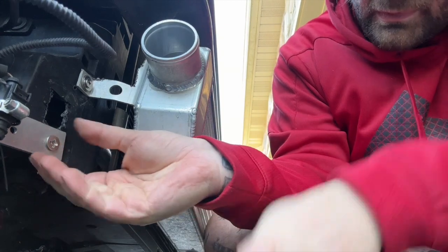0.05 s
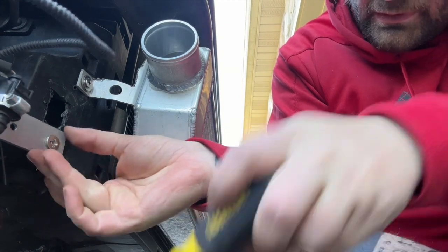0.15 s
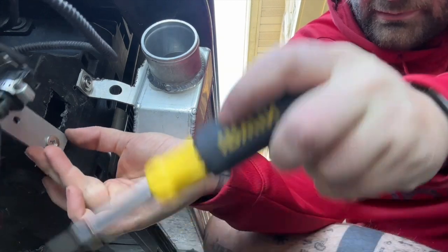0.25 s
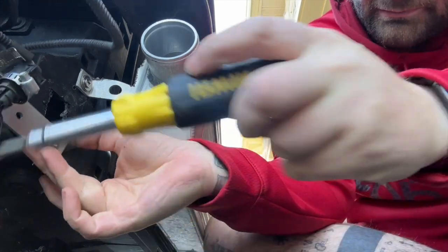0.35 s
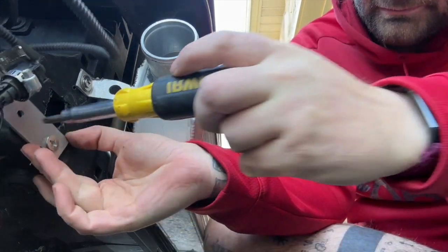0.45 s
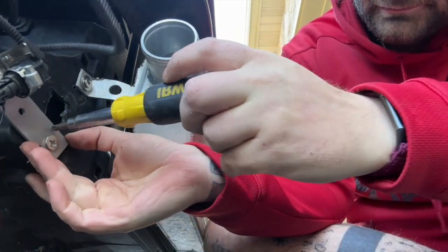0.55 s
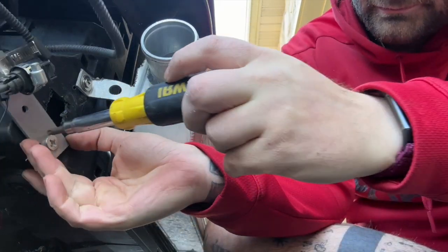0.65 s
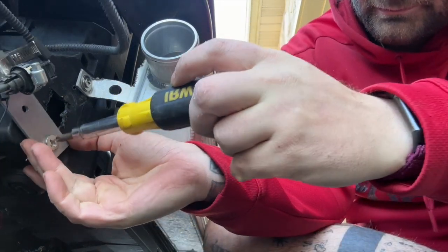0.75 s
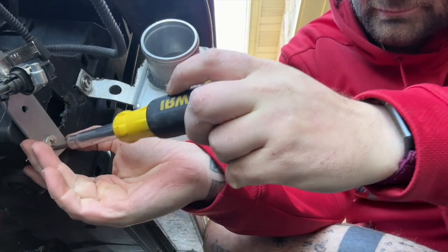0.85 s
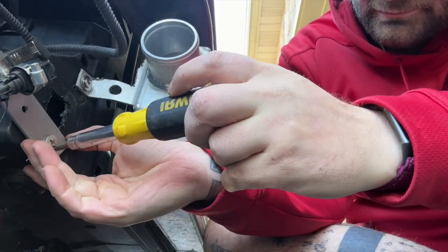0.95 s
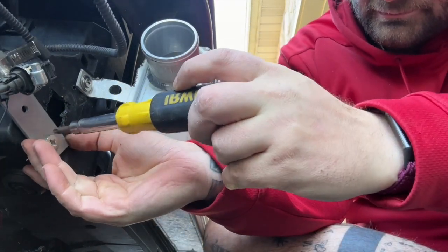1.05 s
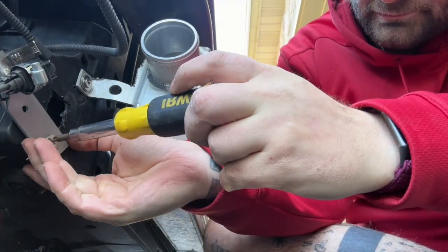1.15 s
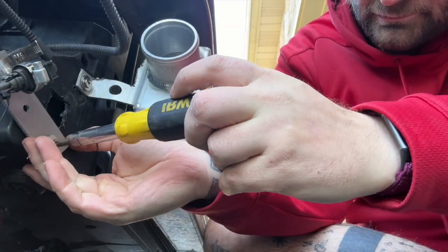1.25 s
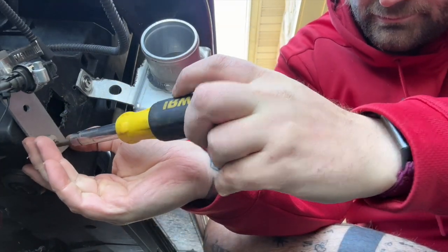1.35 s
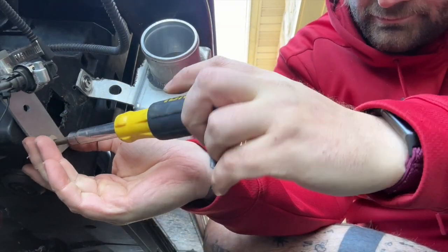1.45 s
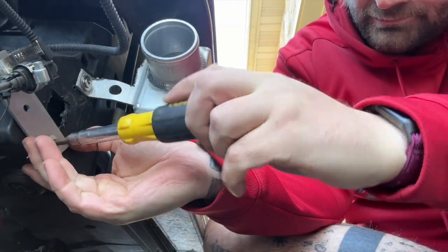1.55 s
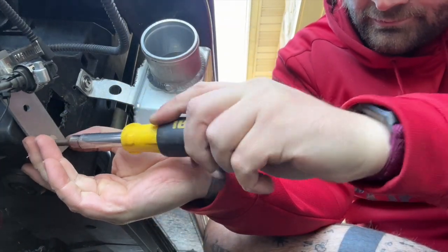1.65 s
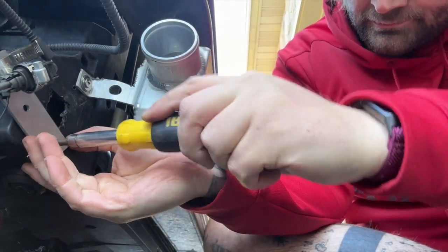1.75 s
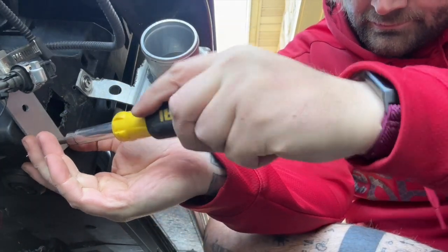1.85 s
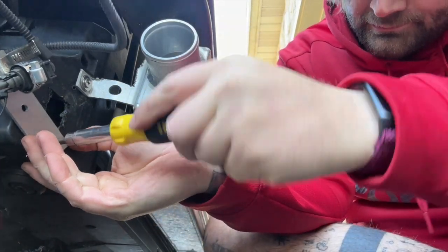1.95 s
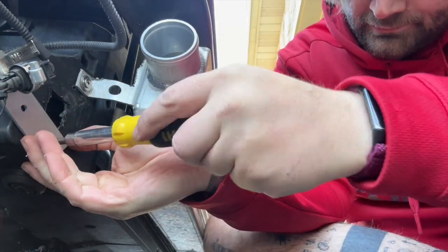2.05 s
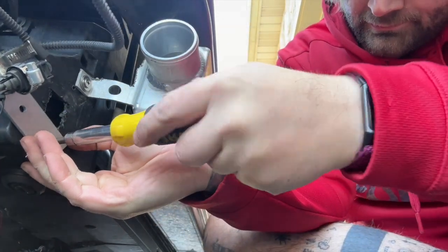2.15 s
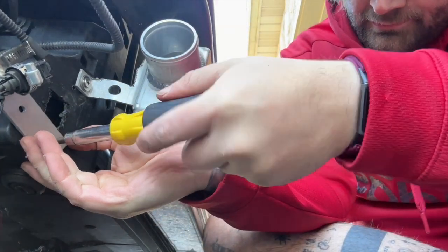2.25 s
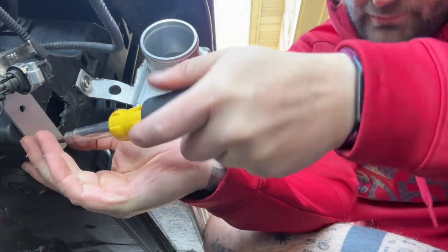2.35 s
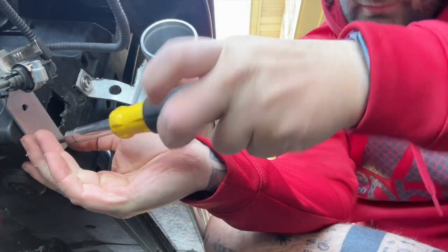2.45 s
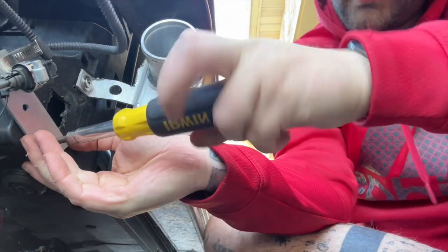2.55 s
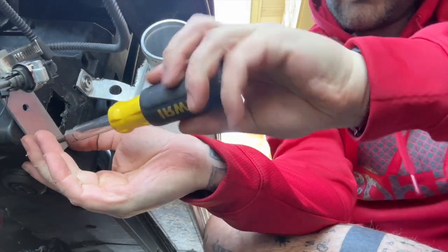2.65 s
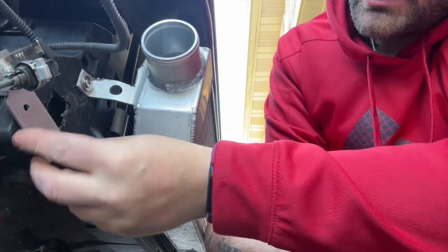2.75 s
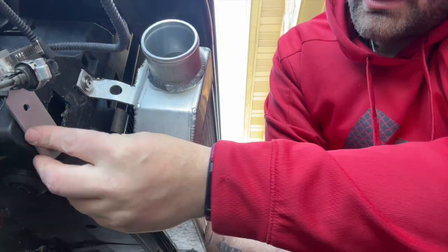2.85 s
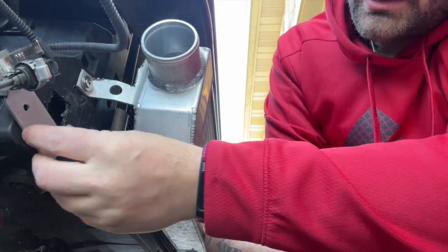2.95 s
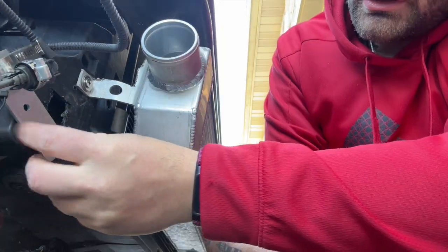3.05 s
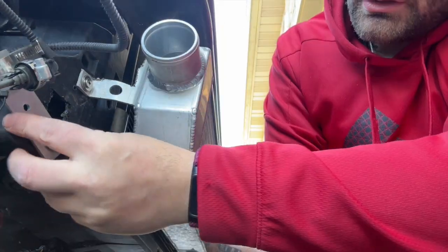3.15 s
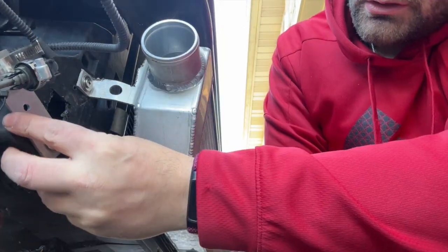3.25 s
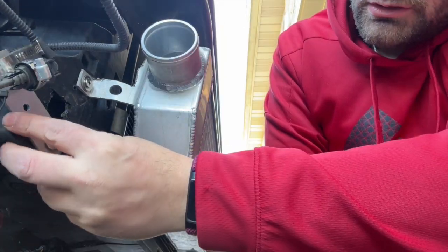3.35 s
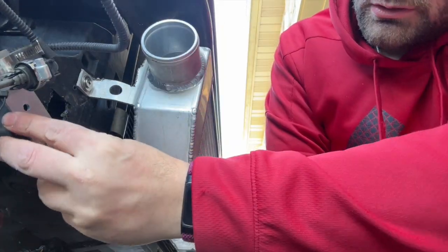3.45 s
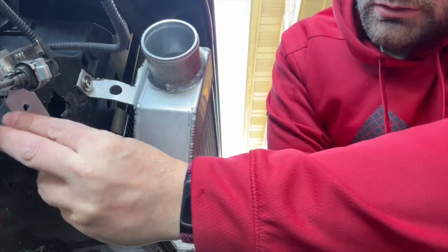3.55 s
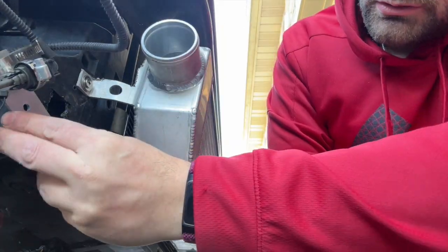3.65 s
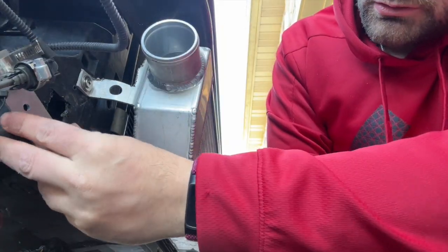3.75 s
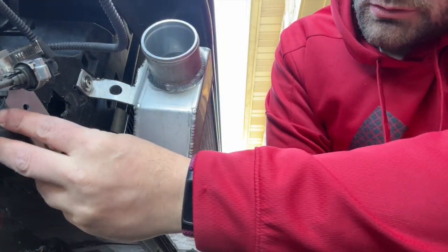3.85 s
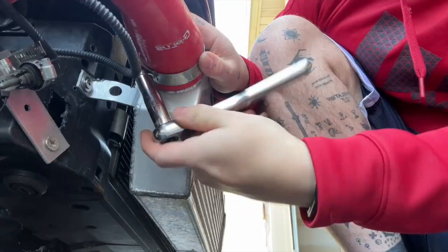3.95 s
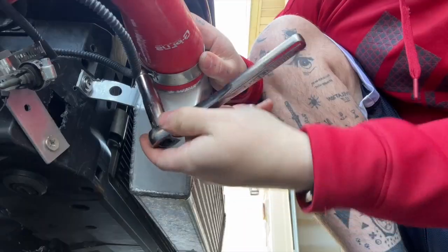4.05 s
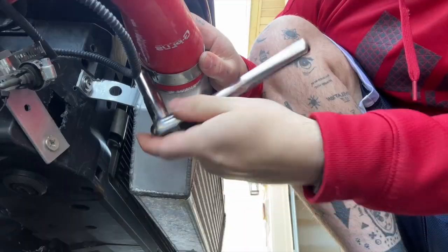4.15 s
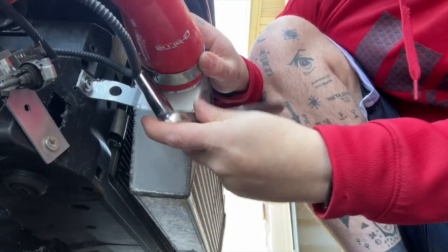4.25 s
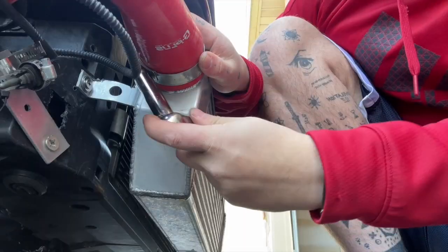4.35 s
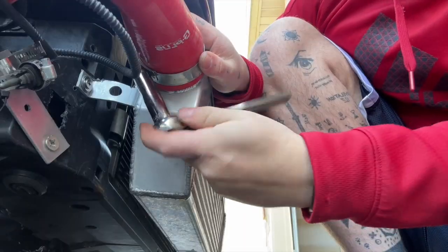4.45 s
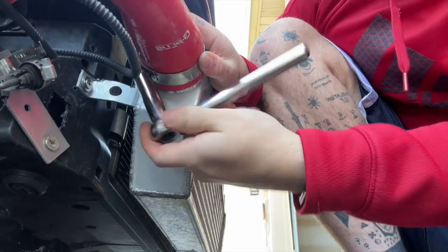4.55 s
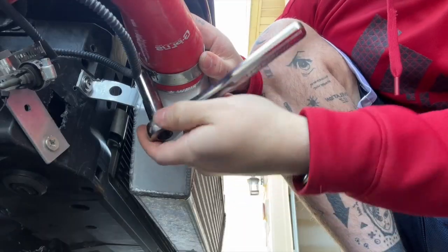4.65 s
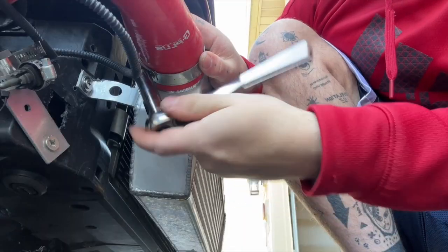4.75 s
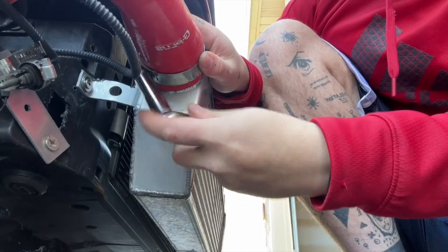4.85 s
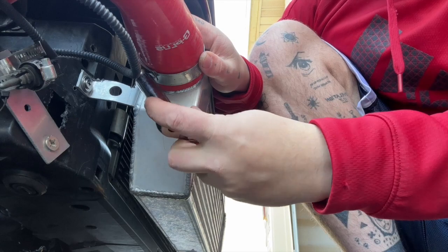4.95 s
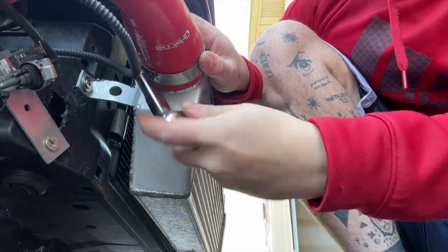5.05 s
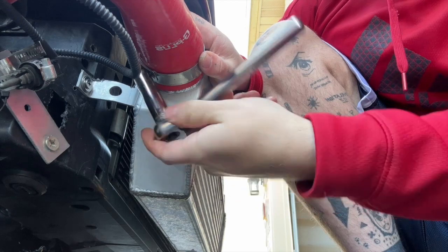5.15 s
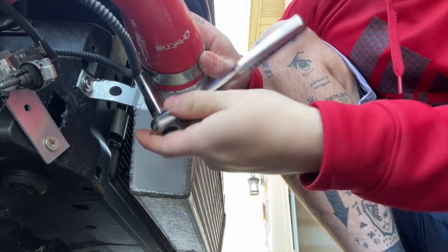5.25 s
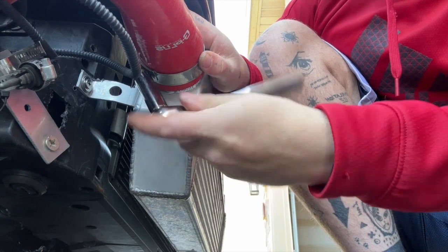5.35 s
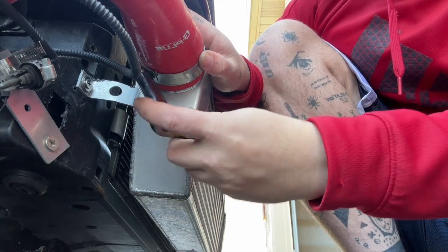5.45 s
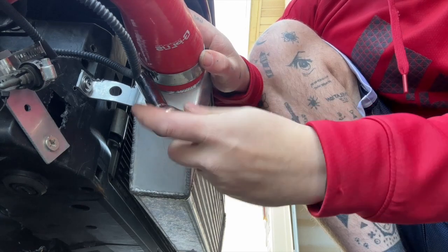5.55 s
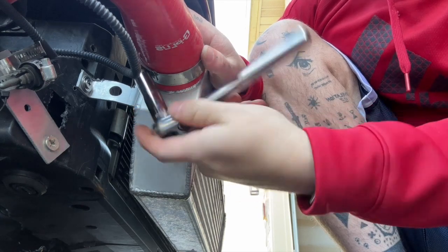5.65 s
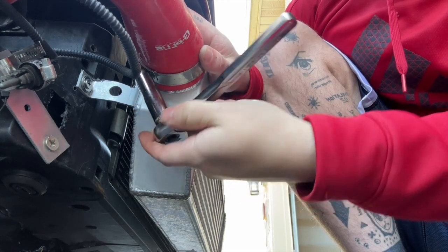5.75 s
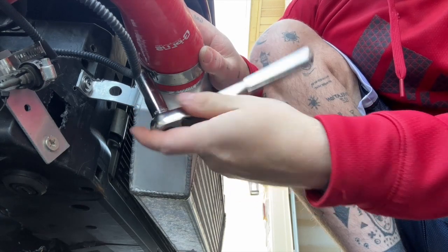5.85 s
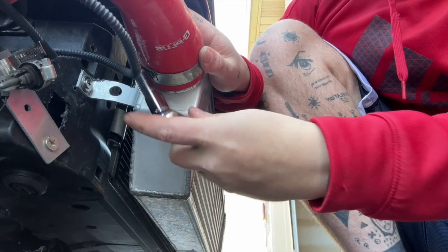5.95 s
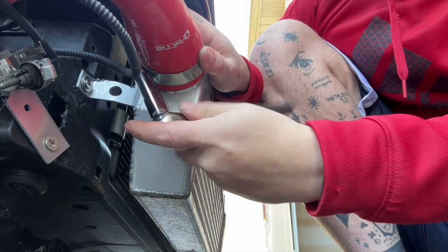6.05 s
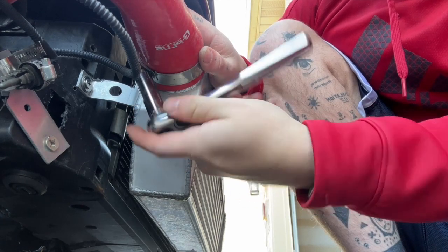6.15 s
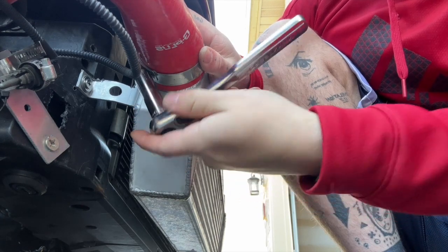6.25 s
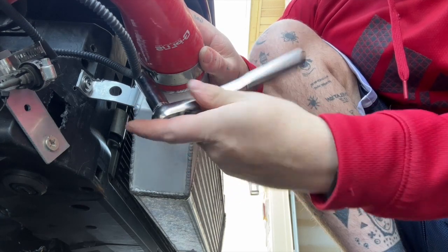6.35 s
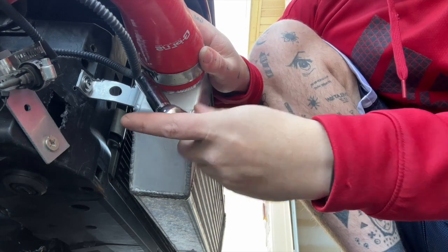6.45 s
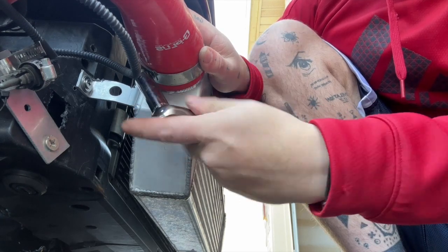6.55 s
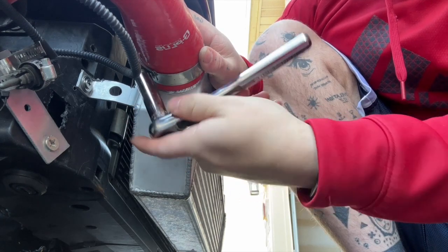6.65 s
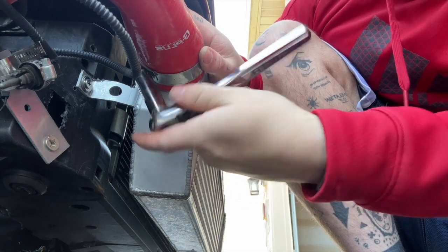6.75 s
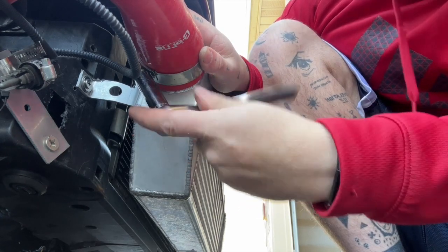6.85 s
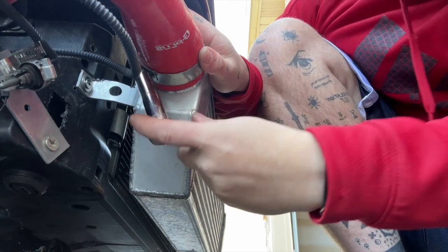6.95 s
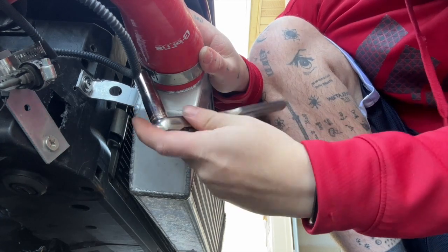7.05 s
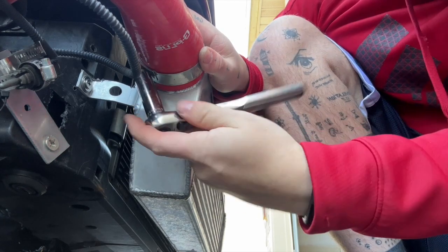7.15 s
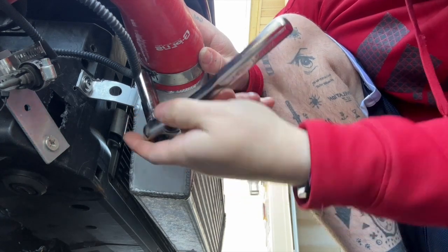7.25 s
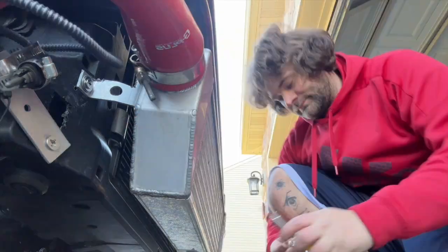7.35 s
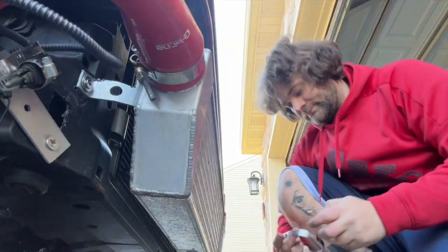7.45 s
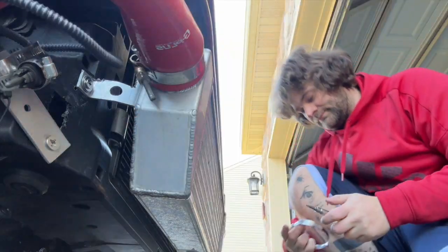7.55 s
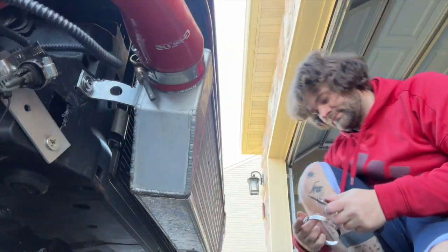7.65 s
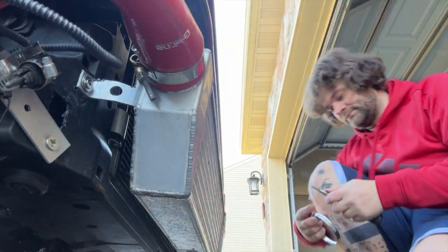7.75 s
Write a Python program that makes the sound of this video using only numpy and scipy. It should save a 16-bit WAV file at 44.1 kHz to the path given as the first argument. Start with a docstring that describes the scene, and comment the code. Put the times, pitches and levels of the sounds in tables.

```python
"""Low garage rumble, faint hum and sleeve rustle, then a screwdriver tip tapping a bolt head on a bracket.
Faint thin tones come and go; later a ratchet wrench clicks on a hose clamp, then a loose clamp is handled.
Contacts: noise bursts ring steel modes and push into panel modes, with engine-bay reflections.
Rubbing and air: shaped noise. Hum and thin tones: wandering sines.
"""
import sys
import numpy as np
from scipy import signal
from scipy.io import wavfile
from scipy.ndimage import uniform_filter1d

SR = 44100
rng = np.random.default_rng(int(sys.argv[2]) if len(sys.argv) > 2 else 0)


def wrap_up_sound(samples):
    """Save the sound to the file named by the first command line argument, as 16-bit audio."""
    columns = np.atleast_2d(samples).T
    # keep every value between -1 and 1, then stretch to whole-number steps
    tamed = np.clip(columns, -1, 1)
    steps = np.round(tamed * 32767).astype(np.int16)
    wavfile.write(sys.argv[1], SR, steps)


N = 344862

# garage rumble and hum breakpoints: time_s, rumble_lift_db, hum_rms_db
GARAGE_LEVELS = [(0, -0.5, -74), (3.899, -1, -62.5), (4.101, -1, -62.5), (7.2, -3, -60.5), (7.45, 8, -53.5),
                 (7.82, 7, -73)]
# relative noise spectra of air, cloth and scuffing skin: freq_hz, density_db_per_hz
AIR_SPECTRUM = [(12, -37), (20, -23), (70, 7), (163, 1), (285, -9.5), (607, -22.5), (780, -22),
                (1480, -34.5), (1660, -30), (1860, -41.5), (2390, -36), (11800, -53), (16000, -45.5)]
CLOTH_SPECTRUM = [(880, -21), (1500, -0.5), (1900, -3), (3060, -1), (5600, -5.5), (8660, -9), (10500, -9),
                  (15100, -15), (16000, -29.5)]
SCUFF_SPECTRUM = [(150, -25), (300, 7), (600, 1), (1250, -3), (1800, -33), (3000, -35.5)]
# sleeve and hand movements: start_s, end_s, rustle_db
MOVES = [(0, .06, -55.5), (0, .56, -60.5), (.56, .66, -63.5), (.66, .76, -78), (.88, .97, -75),
         (1.14, 1.24, -72.5), (1.28, 1.35, -74), (1.42, 1.5, -58), (1.57, 1.7, -57), (1.745, 1.92, -52.5),
         (1.93, 1.99, -57), (1.99, 2.07, -63.5), (2.07, 2.3, -56), (2.28, 2.48, -51.5), (2.5, 2.64, -61.5),
         (2.63, 2.78, -54), (3.06, 3.08, -60), (3.11, 3.17, -71.5), (3.23, 3.28, -73), (3.34, 3.57, -65),
         (3.67, 3.73, -80.5), (3.8, 3.86, -69), (3.92, 4.06, -65), (4.1, 7.36, -77.5), (7.39, 7.42, -51),
         (7.43, 7.51, -46), (7.52, 7.72, -44), (7.73, 7.85, -60.5)]
# skin on metal, one sub-table a stretch: time_s, level_db
SCUFF_STRETCHES = [
    [(0, -53.5), (.2, -62.5), (.5, -60.5), (1.1, -65.5), (1.35, -60.5), (1.7, -53), (1.95, -62),
     (2.3, -61.5), (2.42, -45.5), (2.58, -68), (2.68, -46), (2.752, -53)],
    [(2.758, -63), (3.5, -68), (4.0, -58.5), (4.1, -84)],
    [(7.385, -52), (7.56, -51.5), (7.82, -55.5)],
]
# section boundaries no movement sounds across: time_s
BOUNDARIES_S = (2.755, 7.385)
# screwdriver and fingers on the bolt, at the end a loose clamp in the hands:
# start_s, tick_db, thud_db, contact_ms (nominal peak levels)
TAPS = [(0.0372, -37.5, -57, 0.64), (0.0762, -43.5, -48, 7.6), (0.1234, -45.5, -41.5, 1.9),
        (0.458, -47, -60.5, 0.91), (0.5306, -11, -15.5, 0.93), (0.5766, -38, -40, 2.9),
        (0.8655, -30, -20.5, 0.67), (1.1322, -38.5, -22, 0.4), (1.2042, -57, -39.5, 1.3),
        (1.2509, -27.5, -25, 0.39), (1.273, -33, -25, 0.81), (1.4011, -32.5, -21, 1.1),
        (1.4104, -38, -18, 3.6), (1.4172, -10, -14.5, 1.35), (1.5734, -60, -40, 3.5),
        (1.6512, -29.5, -21, 2), (1.7773, -53, -35, 3.3), (2.3634, -51, -36, 1.6), (2.3873, -42, -21, 2.8),
        (2.4389, -44, -35, 0.86), (2.5439, -61, -44.5, 0.62), (2.637, -45, -48, 1.7),
        (2.6554, -47, -31, 1.3), (2.7136, -44.5, -35, 2.9), (3.064, -50, -43, 4.7), (3.3807, -59, -62, 0.5),
        (3.7001, -55, -50.5, 2.5), (7.3964, -49.5, -47.5, 2.7), (7.4044, -55, -48, 1.2),
        (7.435, -37.5, -50, 1.9), (7.5293, -30, -58, 0.77), (7.5462, -33.5, -66, 1.4),
        (7.5769, -21.5, -52, 0.48), (7.5846, -31, -58, 0.96), (7.6522, -34, -44, 1.8)]
# resonances of screwdriver shaft and bracket: freq_hz, level_db, t60_s
SHAFT_MODES = [(2490, -6, 0.012), (3520, -9, 0.016), (5057, -2, 0.007), (5526, -0.5, 0.022),
               (6100, 0, 0.0054), (7560, -4, 0.012), (8200, -10, 0.0066), (10410, -7, 0.012)]
BRACKET_MODES = [(151.1, -9.5, 0.48), (233, -9.5, 0.28), (311.8, 0, 0.11), (388, -4.5, 0.2),
                 (506, -8.5, 0.18), (621, -1, 0.14), (798, -5, 0.078), (890, 6, 0.071), (1016, -15, 0.12),
                 (1247, -3, 0.048), (1354, -4.5, 0.02), (2070, -25, 0.0089)]
# faint thin tones: start_s, end_s, start_hz, end_hz, level_db, fuzz_0_to_1
WHINES = [(.66, .78, 2430, 2430, -78, .7), (2.54, 2.6, 1340, 1420, -59, .6),
          (2.542, 2.62, 2350, 2300, -61, .6), (2.545, 2.6, 2850, 2700, -63, .6),
          (2.8, 3.04, 1900, 1600, -76, 1), (3.12, 3.25, 1400, 1280, -73, 1),
          (7.22, 7.4, 3400, 3400, -74, .3)]
# socket knocks on the clamp screw: start_s, tick_db, thud_db, contact_ms (nominal peak levels)
KNOCKS = [(3.9761, -39, -46.5, 3.4), (4.1352, -24.5, -33, 0.91), (4.1535, -31, -39.5, 2),
          (4.1976, -51, -43, 2.6), (4.2217, -30, -29.5, 2.9), (4.2354, -42, -32.5, 1.1),
          (4.3173, -21.5, -17.5, 1.8), (4.3918, -40, -36, 1.4), (4.4921, -45.5, -40.5, 1.9),
          (4.6074, -55, -41, 2), (4.7815, -29, -30, 2.5), (4.8829, -31.5, -44, 0.79),
          (4.94, -45.5, -40.5, 1.8), (5.0291, -46, -44, 1.2), (5.0971, -25.5, -31, 1.7),
          (5.1087, -34, -35, 1.1), (5.1536, -40.5, -45, 1.2), (5.3101, -39, -38, 1.4),
          (5.471, -39, -38.5, 0.65), (5.5656, -29, -34, 0.66), (5.604, -36.5, -40.5, 1.5),
          (5.6725, -28.5, -26, 6.5), (5.8337, -44, -35.5, 1.5), (5.8444, -35.5, -44, 2.8),
          (6.0978, -46, -36.5, 1.3), (6.122, -41.5, -40.5, 0.84), (6.324, -18, -25.5, 1.3),
          (6.5181, -43.5, -30.5, 0.59), (6.5901, -30.5, -33.5, 0.94), (6.7918, -28, -27, 7.6),
          (6.9408, -54, -41, 1.2), (6.983, -30.5, -17.5, 2.7), (7.147, -42.5, -34.5, 1.1),
          (7.2133, -57, -43, 2.9), (7.2381, -53, -39, 2.5), (7.357, -49.5, -44, 1.2)]
# light ticks in the wrench head, mostly the pawl dropping over teeth: start_s, tick_db
TICKS = [(4.158, -31), (4.2125, -42), (4.2825, -26), (4.4213, -38), (4.4527, -38.5), (4.464, -45),
         (4.737, -56), (4.8028, -37), (4.829, -24.5), (4.8564, -33.5), (4.8946, -33.5), (4.912, -38),
         (5.035, -33.5), (5.057, -46), (5.0926, -37), (5.1137, -25.5), (5.247, -62), (5.283, -48),
         (5.3423, -40), (5.372, -25.5), (5.3932, -31), (5.4128, -35), (5.4334, -34), (5.452, -36),
         (5.5756, -34.5), (5.589, -42), (5.8179, -34), (5.8675, -37.5), (5.891, -28), (5.914, -30.5),
         (5.9322, -27.5), (5.9543, -32.5), (5.9659, -33.5), (6.0366, -33.5), (6.0526, -34.5), (6.084, -29),
         (6.248, -55.5), (6.3183, -31), (6.3799, -46), (6.4052, -28), (6.4241, -31), (6.4462, -32.5),
         (6.455, -37), (6.4678, -31), (6.56, -44.5), (6.577, -30.5), (6.7473, -46), (6.847, -44),
         (6.8713, -27), (6.8992, -28), (6.954, -35), (7.0018, -32), (7.0367, -48), (7.0756, -46),
         (7.0891, -33), (7.3074, -43)]
# wrench handle swings, to and fro: start_s, end_s, grinding_db
SWINGS = [(4.14, 4.27, -59.5), (4.33, 4.63, -71), (4.79, 4.95, -64.5), (5.05, 5.15, -62.5),
          (5.3, 5.48, -64), (5.58, 5.72, -63.5), (5.84, 5.98, -70), (6.04, 6.14, -62), (6.31, 6.47, -61),
          (6.56, 6.65, -62.5), (6.8, 7.0, -60.5), (7.05, 7.22, -67)]
# resonances of wrench and the sheet metal behind it: freq_hz, level_db, t60_s
WRENCH_MODES = [(2598, -9, 0.085), (4214, -3, 0.044), (4820, 8.5, 0.014), (5480, 5.5, 0.012),
                (6240, 15, 0.0067), (7890, -4.5, 0.049), (10680, 0, 0.027), (12280, 6, 0.0073),
                (12600, -48, .012), (14500, 11, .02)]
TANK_MODES = [(381, -6, 0.13), (452, -4.5, 0.1), (538.6, -3.5, 0.098), (767, 2.5, 0.051), (965, 4, 0.045),
              (1102, -3.5, 0.032), (1191, 8, 0.064), (1322, 2, 0.032), (1720, -19, 0.027),
              (2440, -17, 0.007)]

AIR_DB, HUM_HZ = -57, 105.2
MOVE_RISE_DB_PER_S, MOVE_FALL_DB_PER_S = 497.5, 358
SWING_RISE_DB_PER_S, SWING_FALL_DB_PER_S = 248, 176
ARCH_DB = 7.5  # a movement's middle above its ends
HEAVY_DB_PER_DB = 0.11  # extra dull knock per dB of thud: hard blows wake more of the panel
EVEN_DB = 22.5  # a thud this far above a light one no longer favours the panel's strongest modes
TICK_THUD_DB, TICK_MS = -19, 1.14  # thud relative to tick: a tick barely reaches the panel
# chance rattles of loose parts, following swing strength
RATTLE_DB, RATTLE_SLOPE_DB_PER_DB, RATTLE_SPREAD_DB, RATTLE_THUD_DB = 17.5, 0.99, 1, 2


def gain_of(db):
    """Decibels to amplitude gain."""
    return 10 ** (np.asarray(db) / 20)


def evened(x):
    """Scales to rms 1."""
    return x / np.sqrt(np.mean(x ** 2) + 1e-20)


def add(mix, start_s, sound):
    """Adds a sound into the mix, in place."""
    part = mix[round(start_s * SR):][:len(sound)]
    part += sound[:len(part)]


def noise(spectrum, patchy_db, size=512):
    """Random short-time spectra with drifting strong and weak patches, rms 1."""
    frames, hz = 4 * N // size + 5, np.fft.rfftfreq(size, 1 / SR)
    real, imag, patches = rng.standard_normal((frames, len(hz), 3)).T
    patches = uniform_filter1d(patches, size=8, axis=0)  # over frequency
    patches = evened(uniform_filter1d(patches, size=14, axis=1))  # over time
    spectrum_hz, spectrum_db = np.transpose(spectrum)
    colour_db = np.interp(np.log(hz + 1), np.log(spectrum_hz + 1), spectrum_db)[:, None]
    spectra = (real + 1j * imag) * gain_of(colour_db + patchy_db * patches)
    return evened(signal.istft(spectra, nperseg=size, noverlap=3 * size // 4)[1][:N])


def garage():
    """Rumbling air as low-weighted noise, plus a sine hum of slightly wavering pitch."""
    time_s, lift_db, hum_db = np.transpose(GARAGE_LEVELS)
    t = np.arange(N) / SR
    waver = uniform_filter1d(rng.standard_normal(N), size=3000)
    waver = evened(uniform_filter1d(waver, size=3000))
    hum_hz = HUM_HZ + 1.4 * waver
    hum = np.sqrt(2) * np.sin(2 * np.pi * np.cumsum(hum_hz) / SR)  # rms 1
    air = noise(AIR_SPECTRUM, 0.76, size=4096) * gain_of(AIR_DB + np.interp(t, time_s, lift_db))
    return air + hum * gain_of(np.interp(t, time_s, hum_db))


def moving(rows, rise_db_per_s, fall_db_per_s):
    """Gain over time of movements that swell in, arch and fade; powers add."""
    t, power = np.arange(0, N, 32) / SR, 0
    for start_s, end_s, level_db in rows:
        across = np.clip((2 * t - start_s - end_s) / (end_s - start_s), -1, 1)
        shape_db = level_db - ARCH_DB * across ** 2
        shape_db -= rise_db_per_s * np.maximum(start_s - t, 0)
        shape_db -= fall_db_per_s * np.maximum(t - end_s, 0)
        same_section = np.digitize(t, BOUNDARIES_S) == np.digitize(start_s, BOUNDARIES_S)
        power = power + gain_of(2 * shape_db) * same_section
    return np.repeat(np.sqrt(power), 32)[:N]


def level(stretches):
    """Gain over time from stretches of time_s, level_db; silent between them."""
    t = np.arange(N) / SR
    return sum(gain_of(np.interp(t, *np.transpose(rows), left=-200, right=-200)) for rows in stretches)


def ring(modes, contact, spread, size):
    """A contact force rings a clump of close modes round each listed one, random in sign; peak 1."""
    hz, db, t60_s = np.repeat(np.transpose(modes), 9, axis=1)[:, :, None]
    t = np.arange(size) / SR
    spot, detune, damp = rng.uniform(-1, 1, (3, len(hz), 1))  # the spot struck picks the signs
    decay_db = db - 60 * t / t60_s * (1 + 0.29 * damp)
    tones = np.sin(2 * np.pi * hz * (1 + spread * detune) * t)
    ringing = np.sign(spot) * gain_of(decay_db) * tones
    sound = signal.fftconvolve(contact, ringing.sum(0))
    return sound / abs(sound).max()


def rubbing():
    """Cloth hisses in small uneven slips, the wrench head grinds, skin scuffs dully."""
    slips = uniform_filter1d(rng.exponential(1, N) ** 2 - 2, size=150)
    hiss = evened(noise(CLOTH_SPECTRUM, 2.2) * gain_of(0.73 * evened(slips)))

    grain_gain = gain_of(6.5 * np.minimum(rng.exponential(1, N), 5.5))
    grain_hits = rng.random(N) < 1500 / SR  # mean 1500 grains per second
    grit = grain_gain * grain_hits * rng.standard_normal(N)
    grind = evened(ring(WRENCH_MODES, grit, 0.128, size=400)[:N])
    grind = grind + gain_of(-5.5) * hiss  # the sleeve moves with each stroke

    stroke = moving(SWINGS, SWING_RISE_DB_PER_S, SWING_FALL_DB_PER_S)
    scuffing = level(SCUFF_STRETCHES) + gain_of(-17.5) * stroke ** 0.57  # strokes drag on the clamp
    rustle = hiss * moving(MOVES, MOVE_RISE_DB_PER_S, MOVE_FALL_DB_PER_S)
    return rustle + grind * stroke + noise(SCUFF_SPECTRUM, 3.9) * scuffing


def strikes(events, tool, panel, crack_db, crack_hz, spread, panel_spread, dulling):
    """Rough steel contacts: a wide crack, the tool's ring, and a slower push into the panel."""
    out, t = np.zeros(N), np.arange(1500) / SR
    knock_band = signal.butter(4, [220, 1600], "band", fs=SR, output="sos")
    for start_s, tick_db, thud_db, contact_ms in events:
        tool_grit, panel_grit, loose_grit = rng.standard_normal((3, len(t)))
        decay = t * 1000 / np.clip(contact_ms, .1, 9)

        # a cushioned blow, more thud than tick, is duller
        top_hz = np.clip(crack_hz * gain_of(dulling * (tick_db - thud_db)), 2000, 18000)
        # loose parts rattle on
        chatter = 0.34 * evened(uniform_filter1d(loose_grit, size=40)) ** 2 * np.exp(-t / 0.0045)
        force = (1 - np.exp(-t / 0.00014)) * (np.exp(-decay) + chatter)
        blow = tool_grit * force + 3.72 * (t == t[12])  # one clean blow in the grit
        contact = signal.lfilter(*signal.butter(1, top_hz, fs=SR), blow)
        crack = signal.lfilter(*signal.butter(1, 1500, "high", fs=SR), contact)
        add(out, start_s, gain_of(tick_db + crack_db) * crack / abs(crack).max())
        add(out, start_s, gain_of(tick_db) * ring(tool, contact, spread, size=1500))

        # many damped panel modes die at once
        knock = panel_grit * (1 - np.exp(-t / 0.003)) * np.exp(-t / 0.0054)
        knock = signal.sosfilt(knock_band, knock)
        knock_db = thud_db + HEAVY_DB_PER_DB * (thud_db + 35) - 6.0
        add(out, start_s, gain_of(knock_db) * knock / abs(knock).max())

        # the few clear panel modes ring on
        push = panel_grit * (1 - np.exp(-t / 0.0012)) * np.exp(-decay * 0.51)
        push = np.diff(push + 1.36 * (t == t[40]))
        push = signal.lfilter([1], [1, -.9], push)
        favour = np.clip(1 - (thud_db + 39.5) / EVEN_DB, 0, 1)
        modes = [(hz, min(db, db * favour), t60_s) for hz, db, t60_s in panel]
        ring_db = thud_db - HEAVY_DB_PER_DB * (thud_db + 43) / 2
        add(out, start_s, gain_of(ring_db) * ring(modes, push, panel_spread, size=5000))
    return out


def screwdriver():
    """Tip and finger contacts ring the shaft and thud into the bracket."""
    return strikes(TAPS, SHAFT_MODES, BRACKET_MODES, crack_db=-2.5, crack_hz=5500,
                   spread=0.16, panel_spread=0.114, dulling=0.24)


def bay(x, t60_s=0.2, treble_t60_s=0.078, late_t60_s=0.37):
    """Dense engine-bay reflections, treble dying sooner, with a fainter garage tail."""
    t = np.arange(SR // 2) / SR
    low, high, late = rng.standard_normal((3, len(t))) * (1 - np.exp(-t / 0.00098))
    low = signal.lfilter(*signal.butter(2, 1800, fs=SR), low) * gain_of(5.5 - 60 * t / t60_s)
    high = high * gain_of(-60 * t / treble_t60_s)
    late = signal.lfilter(*signal.butter(1, [3500, 7000], "band", fs=SR), late)
    late = late * gain_of(-13.5 - 60 * t / late_t60_s)
    tail = low + high + late
    return signal.fftconvolve(x, tail / np.linalg.norm(tail))[:N]


def whines():
    """Faint thin gliding sines, fuzzed by random amplitude and pitch."""
    out = np.zeros(N)
    for start_s, end_s, start_hz, end_hz, level_db, rough in WHINES:
        count = round((end_s - start_s) * SR)
        drift = evened(uniform_filter1d(rng.standard_normal((2, SR)), size=300))
        fuzz, wander = drift[:, :count]
        pitch_hz = np.linspace(start_hz, end_hz, count) * (1 + .016 * rough * wander)
        tone = np.sin(2 * np.pi * np.cumsum(pitch_hz) / SR)
        fade = signal.windows.tukey(count, .25)
        add(out, start_s, gain_of(level_db) * (1 + rough * fuzz) * tone * fade)
    return out


def wrench_contacts(count=32):
    """Rows of socket knocks, head ticks, and chance rattles as loud as the swing is strong."""
    when, size = rng.random((count, 2)).T
    first_s, last_s = SWINGS[0][0], SWINGS[-1][1]
    rattle_s = first_s + (np.arange(count) + when) / count * (last_s - first_s)
    stroke = moving(SWINGS, SWING_RISE_DB_PER_S, SWING_FALL_DB_PER_S)
    swing = stroke[(rattle_s * SR).astype(int)]
    rattle_db = 20 * RATTLE_SLOPE_DB_PER_DB * np.log10(swing) + RATTLE_DB
    rattle_db = rattle_db + RATTLE_SPREAD_DB * (2 * size - 1)
    ticks = [(s, db, db + TICK_THUD_DB, TICK_MS) for s, db in TICKS]
    rattles = [(s, db, db + RATTLE_THUD_DB, TICK_MS) for s, db in zip(rattle_s, rattle_db)]
    return KNOCKS + ticks + rattles


def wrench():
    """Ratchet and socket contacts ring the wrench and thud into the sheet metal."""
    return strikes(wrench_contacts(), WRENCH_MODES, TANK_MODES, crack_db=4, crack_hz=7000,
                   spread=0.056, panel_spread=0.087, dulling=0.38)


def scene():
    """Sums garage, rubbing, tools, their reflections and thin tones."""
    taps, clicks = screwdriver(), wrench()
    reflections = bay(gain_of(-16.5) * taps + gain_of(-14) * clicks)
    return (garage() + rubbing() + taps + reflections + whines() + clicks)[None]


def record(dry):
    """The microphone's bass cut and port resonance, then a band limit."""
    thin = signal.sosfilt(signal.butter(4, 52, "high", fs=SR, output="sos"), dry)
    port = thin + 0.58 * signal.lfilter(*signal.iirpeak(5700, 3.5, fs=SR), thin)
    band_limit = signal.firwin(255, 16100, window=("kaiser", 9), fs=SR)  # low-pass, Hz
    return signal.oaconvolve(port, band_limit[None], "same")


dry = scene()
out = record(dry)
wrap_up_sound(out)
```